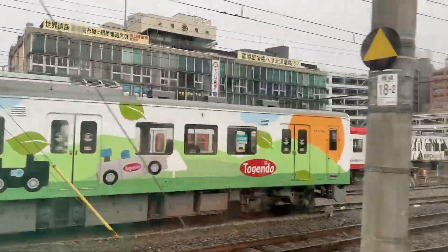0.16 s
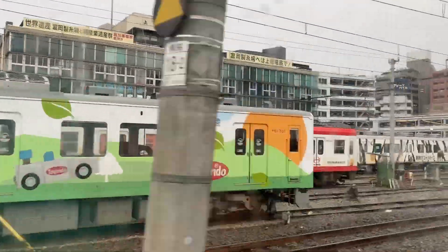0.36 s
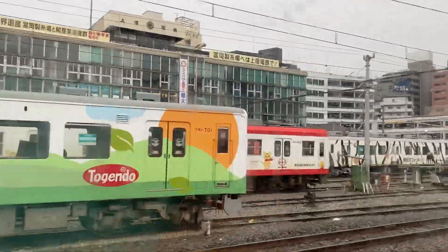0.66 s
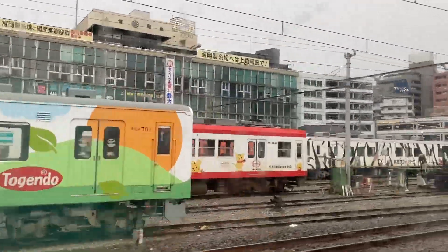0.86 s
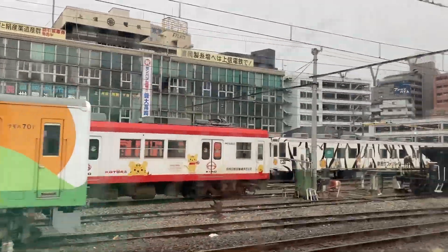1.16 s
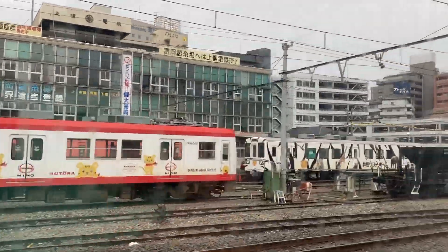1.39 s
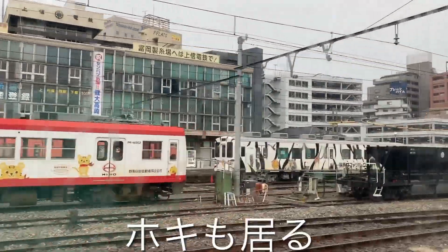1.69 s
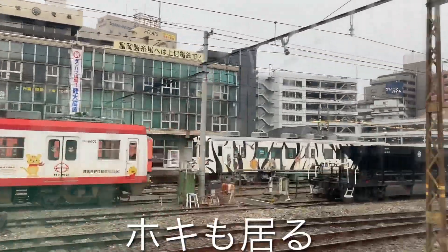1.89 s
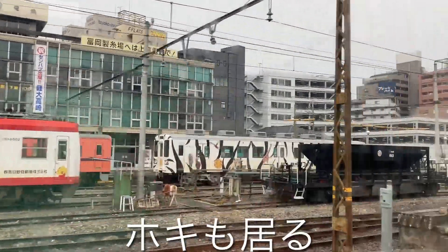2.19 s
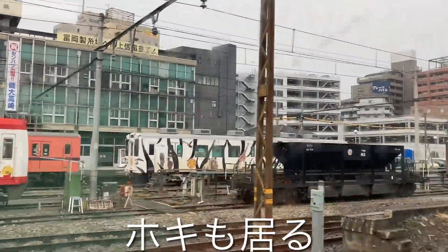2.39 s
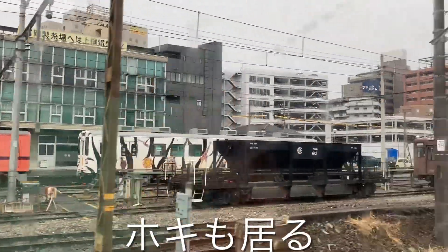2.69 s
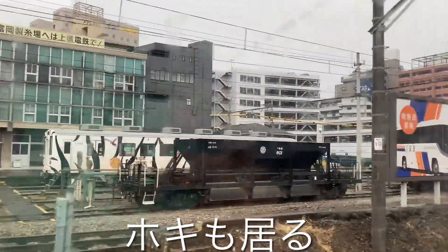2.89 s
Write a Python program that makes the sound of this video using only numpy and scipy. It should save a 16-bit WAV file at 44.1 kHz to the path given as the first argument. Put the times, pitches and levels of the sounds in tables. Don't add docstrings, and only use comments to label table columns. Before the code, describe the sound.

Train clattering over points heard from inside, deep floor thuds with rattling fittings and low motor hum

```python
import sys
import numpy as np
from scipy import signal
from scipy.fft import rfft, irfft, next_fast_len
from scipy.io import wavfile
from scipy.ndimage import uniform_filter1d, map_coordinates

SR = 44100
rng = np.random.default_rng(int(sys.argv[2]) if len(sys.argv) > 2 else 0)


def store_wav(level_fs):
    pcm = np.round(np.clip(np.atleast_2d(level_fs), -1, 1) * 32767)
    wavfile.write(sys.argv[1], SR, pcm.T.astype(np.int16))


def gain_from_db(level_db):
    decades = np.asarray(level_db, float) / 20
    return 10 ** decades


N = 134505


def unit(x):
    return x / np.sqrt(np.mean(x ** 2) + 1e-20)


def along(points, hz):
    f, v = np.transpose(points)
    return np.interp(np.log(hz + 1), np.log(f + 1), v)


def wobble(rate):
    knots = rng.standard_normal(int(N * rate / SR) + 4)
    return map_coordinates(knots, [np.arange(N) * rate / SR])


def filtered(x, response):
    m = next_fast_len(N + 8192)
    return irfft(rfft(x, m) * response(np.fft.rfftfreq(m, 1 / SR)), m)[..., :N]


def peak(centre_hz, width_hz):
    return lambda f: 1j * f * width_hz / (centre_hz ** 2 - f * f + 1j * f * width_hz)


def rush(gain, patchy_db):
    # frequency in Hz, correlation.
    alike = [(60, 0.99), (130, 0.91), (290, 0.88), (500, .65), (700, 0.28), (1400, 0.25), (3100, 0.081)]
    z = signal.stft(rng.standard_normal((2, N)), nperseg=512)[2]
    field = uniform_filter1d(rng.standard_normal(z.shape[1:]), size=5, axis=0)
    field = uniform_filter1d(field, size=8, axis=1)
    pair = signal.istft(z * gain_from_db(patchy_db * unit(field)), nperseg=512)[1][:, :N]

    def mid_side(hz):
        if callable(gain):
            shape = gain(hz)
        else:
            shape = gain_from_db(along([(10, -120)] + list(gain) + [(SR / 2, -120)], hz))
        angle = np.arccos(np.clip(along(alike, hz), -1, 1)) / 2
        return shape * [np.cos(angle), np.sin(angle)]

    mid, side = filtered(pair, mid_side)
    return unit(np.array([mid + side, mid - side]))


def blow(start_s, db, rise_s, hold_s, t60):
    out, first = np.zeros(N), int(start_s * SR)
    t = np.arange(min(N - first, int((hold_s + t60) * SR))) / SR
    release_db = 60 * np.clip(t - hold_s, 0, None) / t60
    out[first:first + len(t)] = gain_from_db(db - release_db) * (1 - np.exp(-t / rise_s))
    return out


def tone(hz, unsteady_hz):
    cycles = np.cumsum(hz + unsteady_hz * wobble(8)) / SR
    return np.sqrt(2) * np.sin(2 * np.pi * (cycles + rng.random()))


def rolling():
    # time in seconds, level in dB.
    strength = [(0, -32), (.35, -30.5), (.5, -30.5), (1, -28), (1.5, -29), (1.95, -30.5), (2.3, -32.5),
                (2.7, -29.5), (3.05, -29)]
    # frequency in Hz, density in dB per Hz.
    rumble_shape = [(12, -31), (26, -14.5), (40, 6), (54, 0.5), (152, 0), (241, -8.5), (425, -8.5),
                    (675, -22), (1400, -43), (3080, -120)]
    # centre in Hz, width in Hz, level over the rumble in dB.
    body_modes = [(58.4, 18.4, -12.5)]
    # frequency in Hz, density in dB per Hz.
    air_shape = [(600, -26.5), (1000, 7.5), (2000, -1.5), (2900, -2), (4000, -9), (6500, -13.5),
                 (11500, -17.5), (16000, -37)]
    air_db, air_follows = -55, 0.15

    s, db = np.transpose(strength)
    roll_db = np.interp(np.arange(N) / SR, s, db)
    rumble = gain_from_db(3.55 * wobble(9.57)) * rush(rumble_shape, patchy_db=0)
    sway = sum(gain_from_db(db) * rush(peak(hz, width), patchy_db=2) for hz, width, db in body_modes)
    swing_db = air_follows * (roll_db - roll_db.mean()) + 0.82 * wobble(5.6)
    air = gain_from_db(air_db + swing_db) * rush(air_shape, patchy_db=3)
    return gain_from_db(roll_db + 0.5) * (rumble + sway) + air


def motor():
    # multiple of the mesh tone, level in dB rms.
    partials = [(1, -39.5), (2, -45), (3, -47.5), (3.85, -53.5), (6.1, -65)]
    mesh_hz = 145
    return sum(gain_from_db(db + 2.5 * wobble(8)) * tone(k * mesh_hz, 3.5) for k, db in partials)


def fittings():
    # start in seconds, peak in dB, centre in Hz, width in Hz, t60 in seconds.
    knocks = [(.002, -30, 420, 250, .4), (.852, -45, 5700, 1200, .15), (2.099, -45, 7700, 700, .25),
              (1.815, -40, 2000, 1600, .3), (1.43, -45, 900, 150, .6), (.885, -45, 1070, 120, .6),
              (.785, -42, 1500, 900, 0.17), (1.451, -55.5, 10230, 300, .5), (1.846, -49, 2920, 300, 0.1),
              (.3, -42.5, 1290, 398, 0.14), (1.266, -47, 3330, 300, 0.36), (1.266, -47.5, 2797, 200, 0.86),
              (1.269, -42, 2050, 486, 0.22), (1.5352, -33.5, 3760, 1300, 0.025),
              (1.5363, -48, 5100, 694, 0.031), (1.575, -33, 3630, 800, 0.025),
              (1.573, -48, 5170, 810, 0.026), (1.719, -41, 3640, 900, 0.04),
              (1.9128, -32, 1220, 600, 0.078), (2.101, -32, 885, 590, 0.081),
              (2.4214, -40.5, 1750, 296, 0.17), (2.422, -42, 4830, 1200, 0.096),
              (2.576, -40, 1820, 500, 0.24), (2.574, -39.5, 1020, 247, 0.15), (2.805, -46, 1380, 600, .15),
              (2.882, -44.5, 1520, 940, 0.47)]
    noise = rng.standard_normal((2, N))
    out = np.zeros((2, N))
    for s, db, hz, width, t60 in knocks:
        ring = unit(filtered(noise, lambda f: peak(hz, width)(f) ** 2))
        out += blow(s, db - 4.5, 0.00058, 0.037 * t60, t60) * ring
    return out


def ticks():
    # start in seconds, peak in dB.
    contacts = [(0.0543, -52), (0.1665, -45), (0.2294, -49.5), (0.2813, -42.5), (0.4064, -49.5),
                (0.6199, -46.5), (0.6887, -56), (0.7814, -50), (0.848, -34), (1.073, -41), (1.1443, -42),
                (1.2401, -48.5), (1.454, -52.5), (1.5364, -49), (1.5748, -46), (1.7169, -48), (1.7764, -52),
                (1.9094, -54), (2.0681, -49), (2.098, -39.5), (2.2732, -56), (2.2901, -47.5), (2.3864, -48),
                (2.4218, -45.5), (2.5621, -31), (2.8398, -42.5)]
    # frequency in Hz, density in dB per Hz.
    tick_shape = [(2000, -23), (4500, -20), (8000, 8.5), (12000, 4), (16000, -8)]
    puffs = sum(blow(s, db - 7, rise_s=0.0002, hold_s=0, t60=0.02) for s, db in contacts)
    return puffs * rush(tick_shape, patchy_db=0.5)


def rattles():
    # start in seconds, peak in dB, t60 in seconds, lower band over peak in dB.
    shakes = [(0.0545, -47.5, 0.17, -4), (0.095, -63.5, 0.082, 19.5), (0.167, -50, 0.35, -17),
              (0.2778, -38.5, 0.39, -5.5), (0.3294, -49.5, 0.49, -8), (0.5227, -49, 0.2, 7.5),
              (0.6205, -46.5, 0.049, -17), (0.6893, -64, 0.2, 6), (0.781, -36, 0.19, -1),
              (0.847, -37.5, 0.2, -7), (1.075, -40, 0.16, -6.5), (1.145, -43, 0.18, -5.5),
              (1.24, -45.5, 0.13, -13), (1.4557, -54.5, 1, -11), (1.6297, -47.5, 0.17, -7),
              (1.6686, -46, 0.091, -16), (1.7184, -49.5, 0.072, -11), (2.0966, -45, 0.3, -2),
              (2.2706, -44.5, 0.15, -2.5), (2.291, -53, 1, -27), (2.4213, -49.5, 0.16, 9.5),
              (2.5613, -33.5, 0.26, -5.5)]
    # frequency in Hz, density in dB per Hz.
    sizzle_shape = [(2500, -9.5), (4500, 3), (7500, -3), (11500, 2.5), (14000, -7.5), (16000, -1.5)]
    # frequency in Hz, density in dB per Hz.
    shake_shape = [(700, -32), (1200, -9), (2000, 32.5), (4000, 27), (6000, -59)]
    high = sum(blow(s, db - 12, 0.0062 * t60, 0.069 * t60, t60) for s, db, t60, _ in shakes)
    low = sum(blow(s, db + up - 9.5, 0.016 * t60, 0.055 * t60, 1.17 * t60) for s, db, t60, up in shakes)
    grain = gain_from_db(1.2 * wobble(200))
    return grain * (high * rush(sizzle_shape, patchy_db=1.5) + low * rush(shake_shape, patchy_db=0.2))


def joints():
    # start in seconds, body level in dB, clack level in dB, body t60 in seconds.
    blows = [(.075, -37, -63, 0.3), (.426, -41, -48, 0.18), (.482, -24.5, -44, 0.43),
             (0.543, -28.5, -39, 0.54), (.62, -28, -37, .3), (0.714, -24, -41, 0.22),
             (.745, -29, -44.5, 0.19), (0.906, -28, -42, 0.48), (1.052, -19.5, -40, 0.32),
             (1.091, -31, -50, 0.22), (1.11, -34.5, -55, 0.27), (1.261, -24, -30, .4),
             (1.291, -23, -36, .4), (1.379, -35.5, -60, 0.42), (1.566, -32.5, -51, .2),
             (1.597, -28, -46, 0.28), (1.618, -25.5, -53, 0.28), (1.661, -37.5, -51, 0.26),
             (1.792, -29, -56, 0.12), (1.813, -18.5, -39.5, 0.48), (2.554, -29.5, -45, 0.24),
             (2.737, -25, -57, 0.71), (2.798, -30.5, -36, 0.43)]
    # frequency in Hz, density in dB per Hz.
    body_shape = [(170, 8), (260, 4.5), (400, -0.5), (580, -2.5), (750, -15), (1000, -15.5), (1400, -41)]
    # frequency in Hz, density in dB per Hz.
    clack_shape = [(900, -5), (1500, -2.5), (2050, -1.5), (2400, -12.5), (2850, 0.5), (3400, -17),
                   (4000, -28), (6000, -53.5)]
    # start in seconds, peak in dB, pitch in Hz, hold in seconds.
    thumps = [(.17, -31.5, 143, 0.016), (.421, -25.5, 160.4, 0.023), (.481, -10.5, 146.3, 0.015),
              (.558, -22.5, 114, .025), (.622, -21, 191, 0.028), (.686, -23.5, 140, .02),
              (.747, -12.5, 132.4, 0.019), (.866, -15.5, 97, 0.0079), (.893, -14, 145, 0.011),
              (.943, -19, 141, 0.018), (.984, -22, 140, 0.012), (1.053, -30, 145, 0.018),
              (1.108, -14.5, 164.3, 0.015), (1.268, -10, 193, 0.01), (1.284, -10, 145, 0.014),
              (1.318, -13, 151, 0.0072), (1.446, -20, 110, 0.017), (1.6, -6, 163.3, 0.013),
              (1.616, -13.5, 163.4, 0.013), (1.65, -15, 110, 0.015), (1.699, -9, 136, 0.0024),
              (1.74, -20.5, 153, 0.036), (1.811, -7, 169, 0.027), (1.842, -11.5, 148.5, 0.011),
              (1.878, -15, 120, .015), (2.232, -24.5, 165, .015), (2.553, -16.5, 106.7, 0.034),
              (2.689, -27, 144.5, 0.023), (2.736, -20, 147.6, 0.029), (2.8, -17, 129, 0.016)]
    # start in seconds, peak in dB, pitch in Hz.
    heaves = [(0.459, -30.5, 102), (1.27, -20.5, 99.6), (0.548, -21.5, 57.4), (0.839, -17, 69.6),
              (1.06, -24.5, 56.8), (1.36, -24, 62.1), (1.471, -30, 60.5), (1.598, -17.5, 58.7),
              (1.811, -21, 60.4), (2.619, -23.5, 61.3), (2.871, -23.5, 54)]
    shake_hold_s = 0.02

    t = np.arange(N) / SR
    floor, heave = np.zeros(N), np.zeros(N)
    for s, db, hz, hold_s in thumps:
        floor += blow(s, db, 0.0016, hold_s, t60=0.048) * np.sin(2 * np.pi * hz * (t - s))
    for s, db, hz in heaves:
        heave += blow(s, db, 0.019, hold_s=0.058, t60=0.17) * np.sin(2 * np.pi * hz * (t - s))
    body = sum(blow(s, db - 6, 0.0027, shake_hold_s, t60) for s, db, _, t60 in blows)
    clack = sum(blow(s, db - 13, 0.00088, shake_hold_s, t60=0.2) for s, _, db, _ in blows)
    shaking = body * gain_from_db(1.0 * wobble(60)) * rush(body_shape, patchy_db=1)
    clacking = clack * gain_from_db(1.7 * wobble(80)) * rush(clack_shape, patchy_db=0)
    return gain_from_db(-3.5) * floor + heave + shaking + clacking


def whine():
    # multiple of the wheel tone, level in dB rms.
    partials = [(2, -62), (3, -57), (4, -63)]
    wheel_hz = 355.3
    fade = blow(2.31, 0, rise_s=0.05, hold_s=0.28, t60=0.35)
    return fade * sum(gain_from_db(db) * tone(k * wheel_hz, 5) for k, db in partials)


def valve():
    # frequency in Hz, density in dB per Hz.
    hiss_shape = [(1200, -23), (2000, -3.5), (3300, -1.5), (5000, -11.5), (7800, -3), (11500, -6),
                  (16000, -11.5)]
    even = gain_from_db(0.6 * wobble(25)) * rush(hiss_shape, patchy_db=0.8)
    return blow(2.55, -52.5, rise_s=0.0067, hold_s=9, t60=1) * even


def scene():
    return rolling() + motor() + fittings() + ticks() + rattles() + joints() + whine() + valve()


def roll_off(x):
    return signal.sosfilt(signal.butter(12, 16790, fs=SR, output="sos"), x)


def record(dry):
    # frequency in Hz, left minus right in dB.
    lean = [(40, -3), (125, -2.5), (250, 1.1), (500, 2), (1000, 4), (2000, -0.5)]
    # frequency in Hz, lead of left over right in radians.
    bass_lead = [(40, .09), (110, .1), (180, -.05), (260, -.28), (600, -.4), (1100, -1), (2000, -1.2)]
    crossover_hz = (4170, 6480)
    turn_hz, in_step_hz, top_hz = 4600, 6900, 15800
    sides = np.array([[1], [-1]])

    def share(hz):
        start, end = crossover_hz
        return np.pi / 2 * np.clip((hz - start) / (end - start), 0, 1)

    def own_port(hz):
        level = gain_from_db(sides * along(lean, hz) / 2)
        return np.cos(share(hz)) * level * np.exp(0.5j * sides * along(bass_lead, hz))

    def one_port(hz):
        phase = np.exp(-1j * np.pi * sides * (hz - in_step_hz) / turn_hz)
        return np.sin(share(hz)) * phase * (hz < top_hz)

    return roll_off(filtered(dry, own_port) + filtered(dry[:1], one_port))


dry = scene()
out = record(dry)
store_wav(out)
```